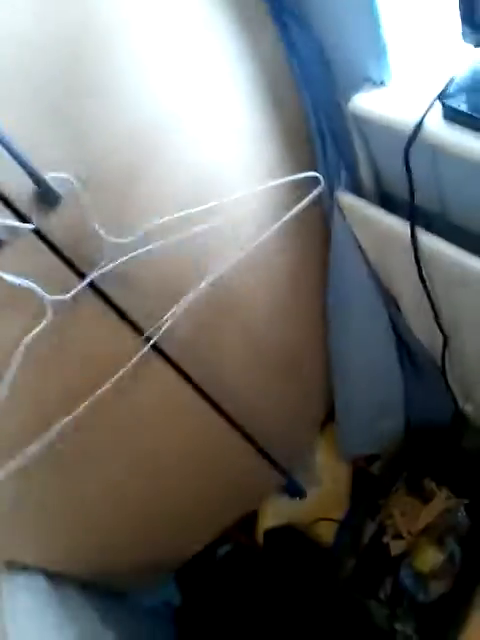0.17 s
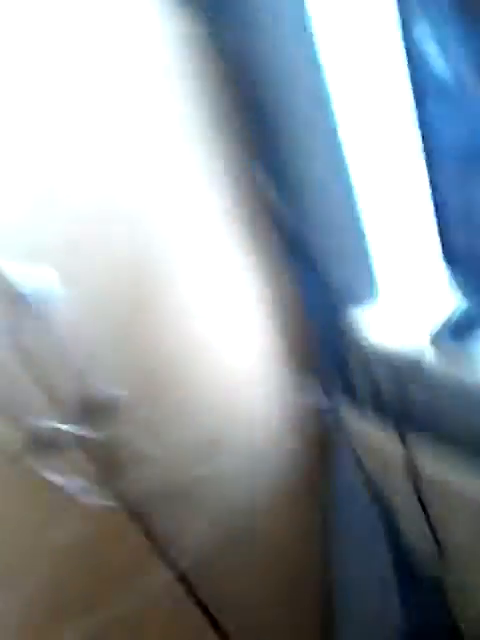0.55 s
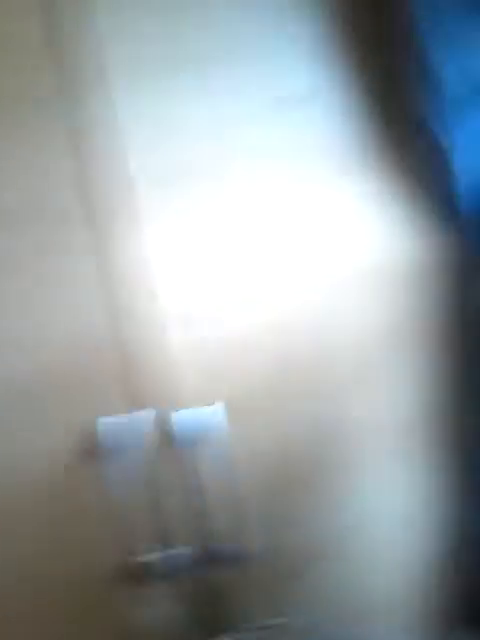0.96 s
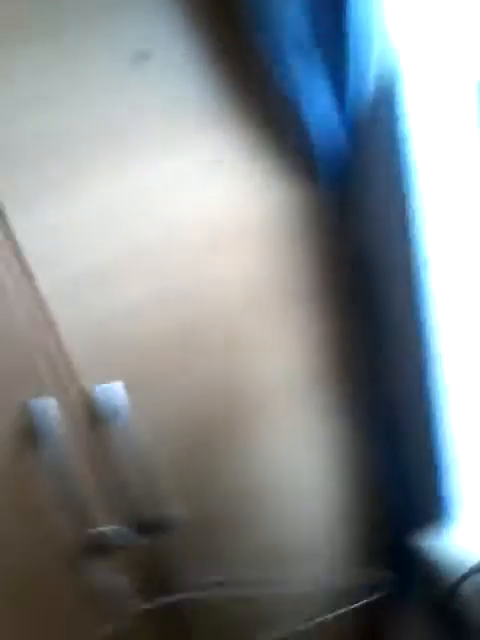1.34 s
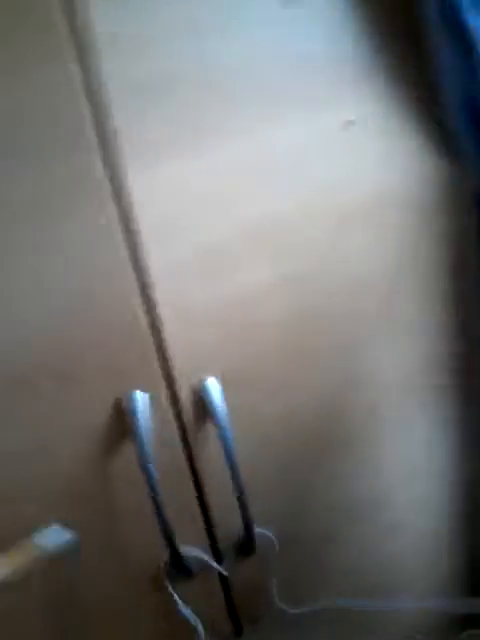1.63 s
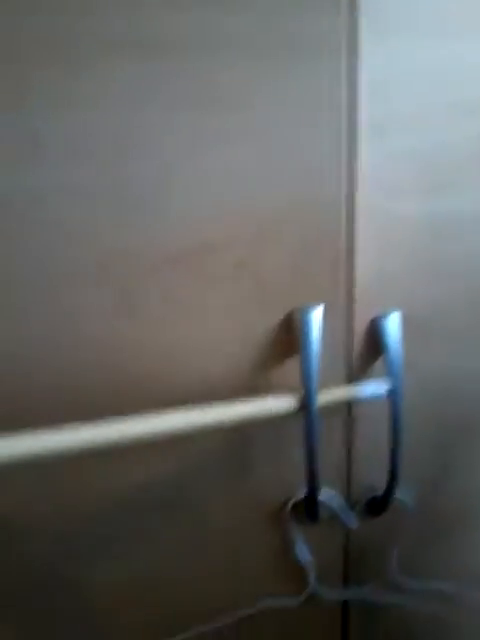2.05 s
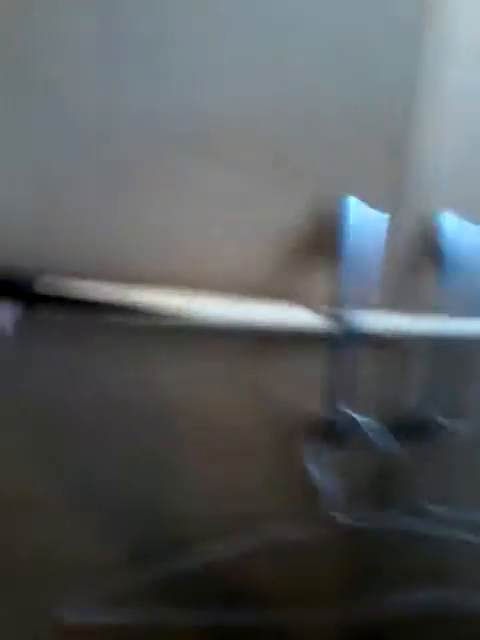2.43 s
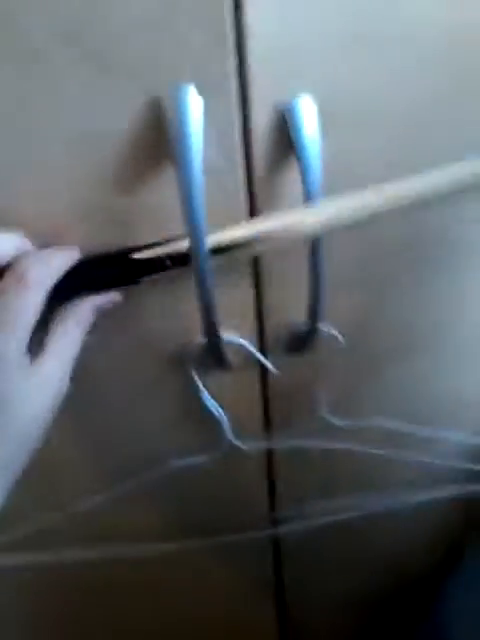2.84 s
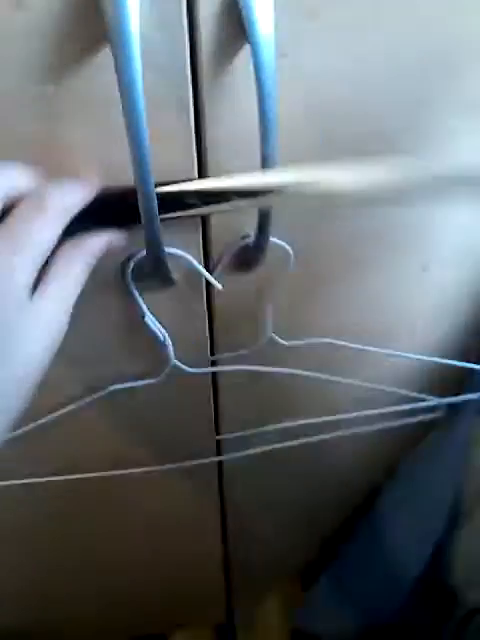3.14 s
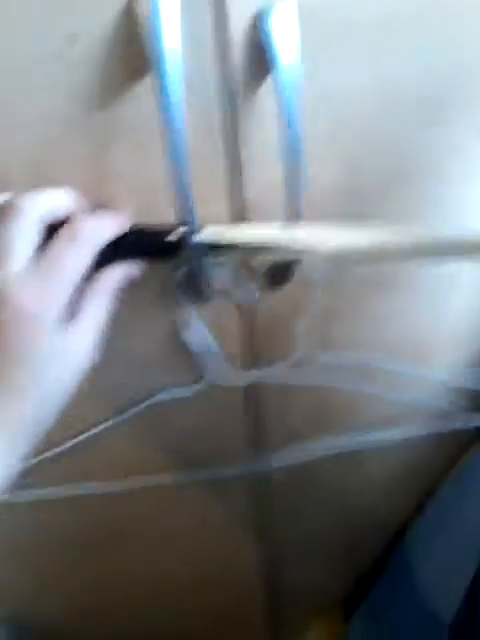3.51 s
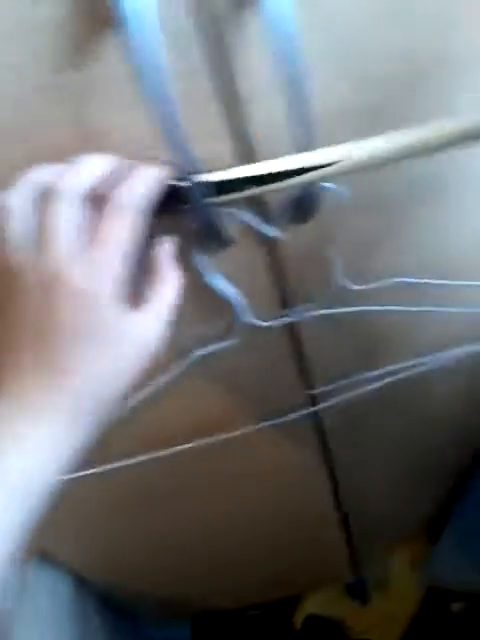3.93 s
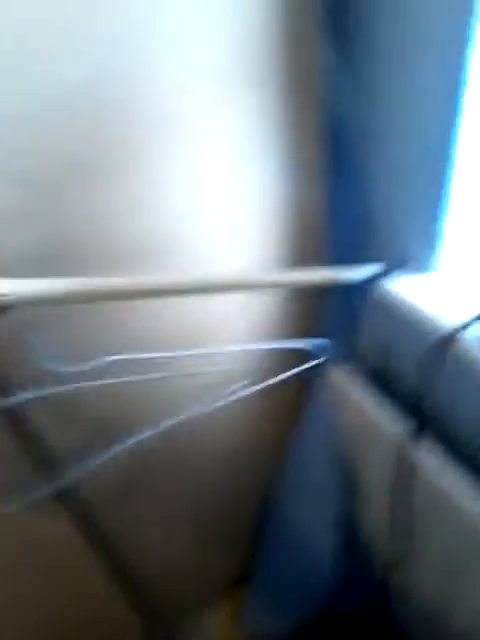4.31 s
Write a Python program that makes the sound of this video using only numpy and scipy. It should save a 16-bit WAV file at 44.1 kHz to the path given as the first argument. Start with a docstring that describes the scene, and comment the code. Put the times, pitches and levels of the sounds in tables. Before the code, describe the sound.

Light wire hanger clicks and brushes give way to a wooden stick rattling and scraping in jerks between metal wardrobe handles.

```python
"""A quiet bedroom: wire hangers swing from wardrobe handles, tick against wire and brush the door.
Then a hand pushes a wooden rod through both handles. It ticks, knocks and scrapes in stick-slip;
the handles ring and the doors boom. A hand-held phone hears it from arm's length,
with a short room tail and its own hiss."""
import sys
import numpy as np
from scipy import signal
from scipy.fft import rfft, irfft, next_fast_len
from scipy.io import wavfile
from scipy.ndimage import uniform_filter1d

SR = 44100
rng = np.random.default_rng(int(sys.argv[2]) if len(sys.argv) > 2 else 0)


def to_wav(s):
    """Save 16-bit WAV."""
    ch = np.atleast_2d(s).T  # columns
    pcm = np.round(np.clip(ch, -1, 1) * 32767)  # PCM
    wavfile.write(sys.argv[1], SR, pcm.astype(np.int16))


N = 197127

# Rod slips: start_s, length_s, handle_db, rod_db, squeak_db, door_db, handle_focus_hz, squeak_focus_hz
ROD_SLIPS = [(1.646, 0.06, -35, -80, -59, -45, 491, 5330), (1.751, .14, -58, -61.5, -51, -59.5, 494, 7350),
             (1.895, 0.11, -54, -53, -49.5, -64, 498, 6900),
             (1.977, 0.023, -38.5, -35, -59, -49, 470, 5800),
             (2.029, 0.06, -46, -41.5, -46.5, -45.5, 464, 5200),
             (2.085, 0.026, -40, -52, -82, -35.5, 514, 5470), (2.122, 0.12, -53, -49, -73, -51, 477, 4700),
             (2.272, 0.056, -67, -53, -43, -64, 460, 6600),
             (2.308, 0.044, -47, -39.5, -40, -55.5, 465, 7240),
             (2.342, 0.052, -40.5, -36, -45.5, -45, 462, 5500),
             (2.405, 0.026, -41.5, -37, -41.5, -46, 465, 5230),
             (2.438, 0.19, -39.5, -40, -47.5, -45, 466, 5900),
             (2.568, 0.13, -43.5, -39.5, -53, -39, 467, 5350),
             (2.673, 0.11, -43.5, -47.5, -58.5, -48, 475, 4840),
             (2.868, 0.081, -47.5, -49, -49, -49.5, 462, 8000),
             (2.944, 0.066, -33, -46, -50, -44.5, 458, 5030),
             (3.018, 0.098, -47, -50.5, -61, -56, 428, 5540),
             (3.133, 0.058, -52, -58.5, -69, -63, 480, 5000),
             (3.192, 0.055, -41.5, -60, -59, -54.5, 443, 4670),
             (3.237, 0.052, -36, -52, -51.5, -63, 469, 4670),
             (3.279, 0.11, -55, -48, -66, -53.5, 486, 4530),
             (3.413, 0.077, -42, -48.5, -61, -46.5, 487, 5900),
             (3.511, 0.098, -48.5, -52.5, -60.5, -53, 486, 6000),
             (3.596, 0.12, -44.5, -52, -50.5, -50.5, 487, 6070),
             (3.829, 0.15, -63.5, -71, -82, -60, 482, 5500),
             (3.948, 0.097, -55, -65.5, -63.5, -62, 485, 5660),
             (4.161, 0.016, -54, -68, -85, -60.5, 503, 5700),
             (4.325, 0.12, -67, -76.5, -88, -64.5, 469, 6200),
             (4.415, 0.15, -53.5, -63.5, -71, -63, 505, 5640)]
# Knocks on wood: start_s, force_db, contact_ms, handle_share_db, rod_share_db
WOOD_KNOCKS = [(0.119, -34.5, 0.056, -36, -35), (.161, -26, 0.035, -28.5, -23),
               (.337, -37, 0.068, -40, -23.5), (0.7, -33, 0.041, -39.5, -35.5),
               (.783, -46.5, 0.11, -31, -24), (1.318, -54.5, .14, -38, -24), (1.609, -43, 0.065, -43, -28),
               (1.655, -27, 0.13, -32.5, -26.5), (1.983, -29, 0.14, -39, -26.5),
               (2.071, -37.5, 0.14, -56, -16), (2.091, -26, 0.13, -29, -25), (2.32, -37, 0.075, -49, -25),
               (2.43, -37, 0.068, -35, -31), (2.614, -27, 0.14, -42, -33.5),
               (3.288, -35.5, 0.13, -46, -26.5), (3.427, -34, 0.2, -39.5, -30.5),
               (3.816, -55, 0.072, -39, -36), (4.164, -47.5, 0.24, -36, -37),
               (4.254, -62.5, 0.11, -60, -28)]
# Ticks of hanger wire, then of the rod on the handles: start_s, peak_db, centre_hz, width_oct, t60_s
METAL_TICKS = [(0.1008, -23.5, 4400, 1.45, 0.031), (0.1225, -21.5, 5040, 2.26, 0.036),
               (0.337, -18, 4100, 2.55, 0.13), (0.7016, -32, 5260, 0.84, 0.025),
               (.8395, -59, 6660, 0.95, .03), (.8664, -31, 7800, 4.8, .035),
               (1.053, -42.5, 3260, 5.3, 0.068), (1.1408, -55.5, 7720, 0.76, .03),
               (1.3179, -57, 7200, 0.43, .037), (1.4286, -51.5, 5240, 2.1, 0.018),
               (1.5873, -54, 7990, 1.7, .023), (1.6092, -41.5, 3450, 1.26, 0.035),
               (1.6556, -34, 3200, 2.4, 0.024), (1.982, -17.5, 3470, 1.9, 0.02),
               (2.146, -38, 3460, 0.32, 0.035), (2.221, -33, 7640, 1.3, 0.015),
               (2.3212, -21.5, 7400, 5.5, 0.018), (2.7016, -34.5, 2860, 0.85, 0.036),
               (2.8909, -14.5, 8080, 1.77, 0.034), (3.1262, -41, 2620, 1.6, .03),
               (3.3044, -39, 2870, 2.4, .022), (3.4777, -39.5, 5600, 0.67, 0.088),
               (3.5343, -40, 6400, 0.42, 0.017), (3.728, -55, 6550, 3.8, 0.034),
               (3.8666, -46, 2840, 1.3, 0.015), (3.932, -49.5, 7500, 1.6, 0.072)]
# Scuffs on metal: start_s, peak_db, centre_hz, width_oct, length_s
METAL_SCUFFS = [(0.8564, -32.5, 8400, 0.81, 0.024), (1.102, -50, 4280, 2.8, 0.013),
                (1.227, -58, 3720, 3.3, 0.023), (1.485, -31.5, 8150, 3.84, 0.03),
                (2.231, -27, 5000, 5, 0.015), (2.276, -33.5, 8200, 1.8, 0.029)]
# Hanger brushes on the door: start_s, length_s, hiss_db, rustle_db, rumble_db
HANGER_BRUSHES = [(0., 0.013, -46, -47, -57.5), (0.056, 0.091, -55, -59, -62.5),
                  (0.153, 0.055, -72, -47.5, -51.5), (0.329, 0.1, -56, -79, -62.5),
                  (0.624, 0.16, -69, -78, -64.5), (0.789, 0.11, -78, -63.5, -65),
                  (1.051, 0.045, -68, -87, -72), (1.308, 0.028, -98, -80, -70),
                  (1.496, 0.14, -78, -96, -72.5)]
# Thumps through door and hand: start_s, peak_db, pitch_hz, t60_s
SOFT_THUMPS = [(0.661, -47, 58, 0.076), (1.06, -51.5, 53.7, 0.1), (1.659, -59, 71, 0.051),
               (1.998, -35, 82, 0.43), (2.748, -21.5, 108, 0.045), (2.891, -30.5, 49.7, 0.1),
               (2.979, -30, 62, 0.049), (3.072, -34.5, 85.4, 0.19), (3.306, -32.5, 78, 0.56),
               (4.189, -49, 73, 0.31)]
# Modes of each body: pitch_hz, gain_db, t60_s
HANDLE_MODES = [(457, 0, .24), (506, 0, .28), (570, -11, .15), (630, -14, .1), (346, -11, .15)]
ROD_MODES = [(890, -3, 0.023), (927, -9.5, 0.025), (1183, 0, 0.059), (1219, -3.5, 0.12), (1495, 0.5, 0.016),
             (1642, 1, 0.029), (1869, 1.5, 0.012), (2050, -4, 0.059), (2240, -4, 0.027),
             (2800, 4.5, 0.0064)]
METAL_MODES = [(3410, -3, 0.014), (3524, 7, 0.0086), (4400, -3, 0.012), (4790, -4, 0.017), (5480, -7, 0.02),
               (6560, 1, 0.018), (7630, 6.5, 0.0085), (7860, 6.5, 0.0074), (8070, 11.5, 0.0065),
               (9800, -9, 0.0063), (11000, -35, 0.0069)]
DOOR_MODES = [(48, -18, .1), (76.9, 4.5, 0.21), (113, -1.5, 0.11), (196, 1.5, 0.055), (248.2, -6, 0.18)]
# Microphone hiss spectrum: freq_hz, relative_density_db
HISS_SPECTRUM = [(25, 7.5), (80, -0.5), (160, -2), (500, -5), (1000, -13), (2500, -18), (7500, -17),
                 (11000, -21), (16000, -20.5)]

SLIP_T60_S = (0.21, 0.2, 0.09, 0.26)  # handle, rod, squeak, door
BRUSH_T60_S = (0.25, 0.11, 0.21)  # hiss, rustle, rumble
REBOUND_TAU_S = 0.019
ROOM_T60_S, METAL_SEND_DB, WOOD_SEND_DB = 0.25, -11, -10
MIC_CUTOFF_HZ, OUTPUT_CUTOFF_HZ = 7290, 15780
HISS_DB, HISS_LIFT_DB_PER_DB, SUPPRESSOR_TAU_S = -74.5, 0.42, 0.045


def rod_scrape():
    """The rod slips over the handles: one rough contact shakes handles, rod, metal skin and doors."""
    start_s, length_s, *levels_db, handle_hz, squeak_hz = np.transpose(ROD_SLIPS)
    gains = envelopes(start_s, length_s, levels_db, SLIP_T60_S, rise_share=0.28)
    handle_gain, rod_gain, squeak_gain, door_gain = gains
    current = np.maximum(np.searchsorted(start_s * SR, np.arange(N)) - 1, 0)  # slip under way
    contact = stick_slip(rate_hz=3000) * wobble(2.5, 40)
    handle = level(ring(contact, HANDLE_MODES, 2.5, 10, focus_hz=handle_hz[current], sharpness_db=38))
    handle += undb(-28.5) * unit_rms(band(contact, 293, 480))
    rod = level(ring(contact, ROD_MODES, 6, 22.04))
    rod += undb(-3) * unit_rms(band(contact, 367, 3180))
    squeak = level(ring(contact, METAL_MODES, 4.9, 18, focus_hz=squeak_hz[current], sharpness_db=12.2))
    squeak += undb(-4) * unit_rms(band(contact, 2120, 10600))
    boom = ring(contact, DOOR_MODES, 4, 9)
    chatter = wobble(spread_db=2, rate_hz=45)  # the rod catches and lets go
    scrape = chatter * (rod_gain * level(rod, 0.098) + squeak_gain * level(squeak, 0.089))
    return handle_gain * level(handle, 0.073) + scrape + door_gain * level(boom, 0.077)


def wood_knocks():
    """A blow and its rebounds clack on the door and ring handles and rod; longer contact is duller."""
    door, handle, rod = np.zeros((3, N))
    t = np.arange(6000) / SR
    for start_s, force_db, contact_ms, handle_share_db, rod_share_db in WOOD_KNOCKS:
        chance = rng.random(len(t))
        blows = (chance < 0.03) * np.cos(chance * 1000)  # sparse, random size and sign
        blows *= np.exp(-t / REBOUND_TAU_S)
        blows[0] = 1.48  # first contact is hardest
        pulse = np.exp(-(t[:200] * 1000 / contact_ms - 2) ** 2)
        force = np.convolve(blows, pulse / pulse.sum())
        place(door, start_s, force, force_db)
        place(handle, start_s, force, force_db + handle_share_db)
        place(rod, start_s, force, force_db + rod_share_db)
    clack = undb(7.5) * band(door, 1090, 4130)
    return ring(handle, HANDLE_MODES, 0.51, 4.2) + ring(rod, ROD_MODES, 3.22, 22.7) + clack


def metal_contacts():
    """Sharp ticks and swelling scuffs of hanger wire, then of the rod on the handles; the metal rings."""
    contacts = np.zeros(N)
    t = np.arange(4000) / SR
    snap = 1 + 0.77 * np.exp(-t / 0.0007)
    shapes = [snap * 10 ** (-3 * t / t60_s) for *_, t60_s in METAL_TICKS]
    shapes += [np.sin(np.pi * np.clip(t / length_s, 0, 1)) ** 2 for *_, length_s in METAL_SCUFFS]
    for (start_s, peak_db, centre_hz, width_oct, _), shape in zip(METAL_TICKS + METAL_SCUFFS, shapes):
        noise = rng.standard_normal(len(t))
        chatter = noise * np.abs(noise) * shape  # squared for spikiness
        edge_ratio = 2 ** (width_oct / 2)
        place(contacts, start_s, band(chatter, centre_hz / edge_ratio, centre_hz * edge_ratio), peak_db)
    return contacts + undb(-37.5) * ring(contacts, METAL_MODES, 4.9, 12)


def hanger_brushes():
    """Thin wire drags over the door: the wire hisses, the face rustles, the door rumbles."""
    start_s, length_s, *levels_db = np.transpose(HANGER_BRUSHES)
    gains = envelopes(start_s, length_s, levels_db, BRUSH_T60_S, rise_share=0.083)
    hiss_gain, rustle_gain, rumble_gain = gains
    contact = stick_slip(rate_hz=5000) * wobble(3, 25)
    hiss = unit_rms(band(contact, 2200, 9500, order=1))
    hiss += undb(-3) * unit_rms(ring(contact, METAL_MODES, 4, 25))
    rustle = band(contact, 290, 2200, order=1)
    rumble = ring(contact, DOOR_MODES, 18, 24.47)
    return hiss_gain * level(hiss) + rustle_gain * level(rustle) + rumble_gain * level(rumble, 0.031)


def soft_thumps():
    """Low damped swings through door and hand."""
    out = np.zeros(N)
    t = np.arange(SR // 2) / SR
    attack = 1 - np.exp(-t / 0.0026)
    for start_s, peak_db, pitch_hz, t60_s in SOFT_THUMPS:
        swing = np.sin(2 * np.pi * pitch_hz * t) * 10 ** (-3 * t / t60_s)
        place(out, start_s, swing * attack, peak_db)
    return out


def room_tail(x):
    """Small furnished room: dense, short reflections of unit energy."""
    t = np.arange(SR // 2) / SR
    decay = 10 ** (-3 * t / ROOM_T60_S) * np.clip(t / 0.00022, 0, 1)
    tail = band(rng.standard_normal(len(t)) * decay, 287, 7300, order=1)
    return signal.oaconvolve(x, tail / np.sqrt(np.sum(tail ** 2)))[:N]


def handling_rumble():
    """The bass wavers as the phone moves in the hand."""
    return undb(-83) * unit_rms(band(rng.standard_normal(N), 27, 43)) * wobble(1.9, 8)


def stick_slip(rate_hz, spread_db=2):
    """Friction force: irregular clicks, a few much stronger than the rest."""
    hits = rng.random(N) < rate_hz / SR
    return hits * rng.choice([-1, 1], N) * undb(spread_db * rng.exponential(size=N))


def ring(force, modes, spread_db, wander_hz, focus_hz=None, sharpness_db=0):
    """Driven modes; the contact point wanders, so each is fed unevenly, most near any focus."""
    out = 0
    for k, (pitch_hz, gain_db, t60_s) in enumerate(modes):
        radius = np.exp(-np.log(1000) / (t60_s * SR))
        angle = 2 * np.pi * pitch_hz / SR
        drive = force * wobble(spread_db, wander_hz)
        if focus_hz is not None:
            detune = pitch_hz / focus_hz - focus_hz / pitch_hz
            drive /= 1 + undb(sharpness_db) * detune ** 2
        gain = (-1) ** k * undb(gain_db) * np.sin(angle)
        out += signal.lfilter([gain], [1, -2 * radius * np.cos(angle), radius ** 2], drive)
    return out


def envelopes(starts_s, lengths_s, levels_db, t60_s, rise_share):
    """One gain per body: each stroke swells, holds, then fades at the body's t60; powers add."""
    power = np.zeros((len(t60_s), N))
    for start_s, length_s, hold_db in zip(starts_s, lengths_s, np.transpose(levels_db)):
        t = np.arange(N) / SR - start_s
        swell = np.sin(np.pi / 2 * np.clip(t / (rise_share * length_s), 0, 1)) ** 2
        fade_db = -60 * np.maximum(t - length_s, 0) / np.array(t60_s)[:, None]
        power += (swell * undb(hold_db[:, None] + fade_db)) ** 2
    return np.sqrt(power)


def wobble(spread_db, rate_hz):
    """Gain wandering between random levels."""
    knots = undb(spread_db * rng.standard_normal(400))
    return np.interp(np.arange(N) * (rate_hz / SR), np.arange(len(knots)), knots)


def level(x, span_s=0.12):
    """Hold the running rms near 1, keeping the grain."""
    return x / np.sqrt(uniform_filter1d(x ** 2, int(span_s * SR)) + 1e-12)


def place(out, start_s, sound, peak_db):
    """Mix in a sound at a peak level."""
    i = int(start_s * SR)
    piece = sound[:N - i] * undb(peak_db) / np.abs(sound).max()
    out[i:i + len(piece)] += piece


def band(x, low_hz, high_hz, order=2):
    """Butterworth band-pass."""
    edges_hz = [low_hz, min(high_hz, 0.45 * SR)]
    return signal.sosfilt(signal.butter(order, edges_hz, "band", fs=SR, output="sos"), x)


def unit_rms(x):
    """Scale to rms 1."""
    return x / np.sqrt(np.mean(x ** 2))


def undb(db):
    """Decibels to gain."""
    return 10 ** (np.asarray(db) / 20)


def scene():
    """All sources in mono; metal and wood feed the room."""
    metal = metal_contacts()
    wood = rod_scrape() + wood_knocks() + hanger_brushes()
    tail = room_tail(undb(METAL_SEND_DB) * metal + undb(WOOD_SEND_DB) * wood)
    return (metal + wood + soft_thumps() + tail + handling_rumble())[None]


def record(dry):
    """The microphone loses treble and hisses; a noise suppressor passes more hiss under sound."""
    heard = signal.sosfilt(signal.butter(2, MIC_CUTOFF_HZ, fs=SR, output="sos"), dry)
    freq_hz, density_db = np.transpose(HISS_SPECTRUM)
    size = next_fast_len(N)
    bins_hz = np.fft.rfftfreq(size, 1 / SR) + 1
    colour = undb(np.interp(np.log(bins_hz), np.log(freq_hz), density_db))
    hiss = unit_rms(irfft(rfft(rng.standard_normal(size)) * colour, size)[:N])
    pole = np.exp(-1 / (SUPPRESSOR_TAU_S * SR))
    power = signal.lfilter([1 - pole], [1, -pole], heard ** 2)
    lift = (1 + power / undb(HISS_DB) ** 2) ** (HISS_LIFT_DB_PER_DB / 2)
    steep_lowpass = signal.ellip(10, 0.2, 60, OUTPUT_CUTOFF_HZ, fs=SR, output="sos")
    return signal.sosfilt(steep_lowpass, heard + undb(HISS_DB) * lift * hiss)


dry = scene()
out = record(dry)
to_wav(out)
```